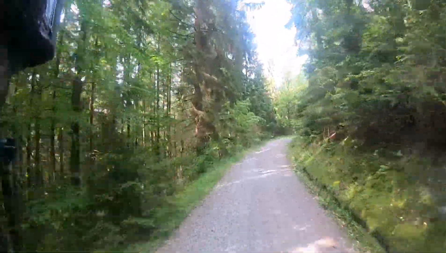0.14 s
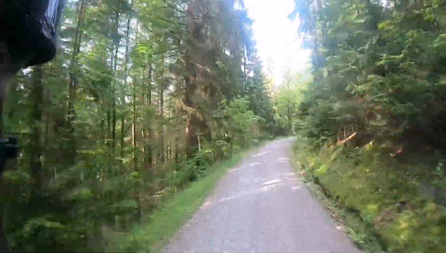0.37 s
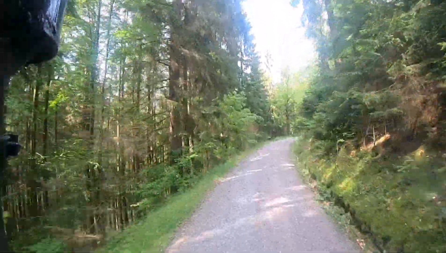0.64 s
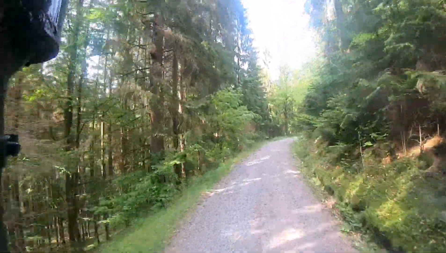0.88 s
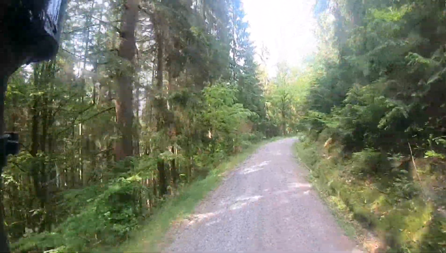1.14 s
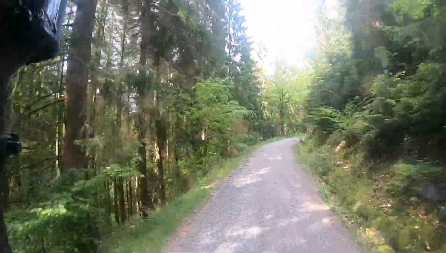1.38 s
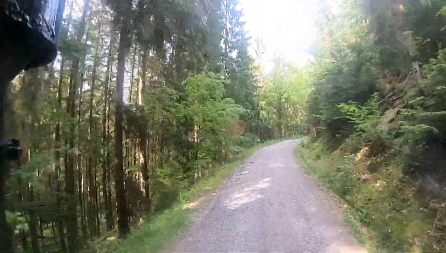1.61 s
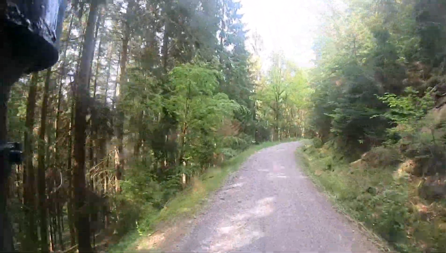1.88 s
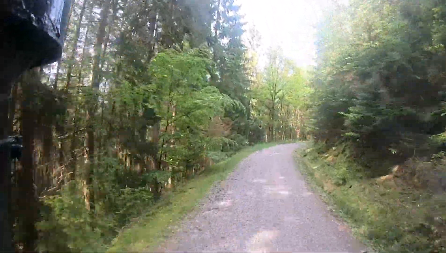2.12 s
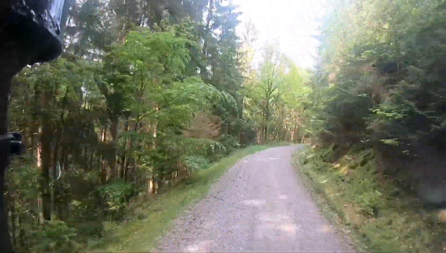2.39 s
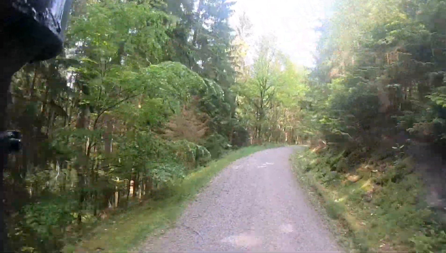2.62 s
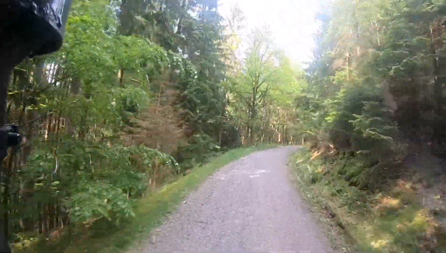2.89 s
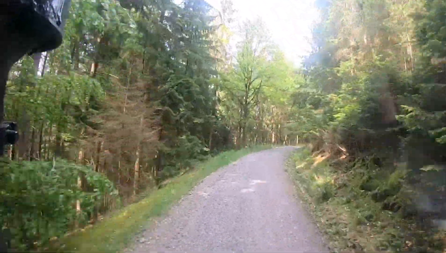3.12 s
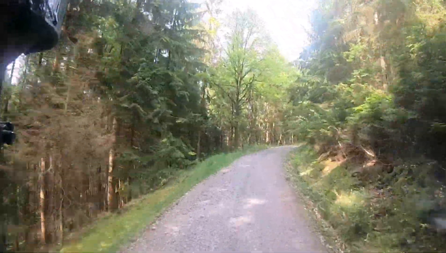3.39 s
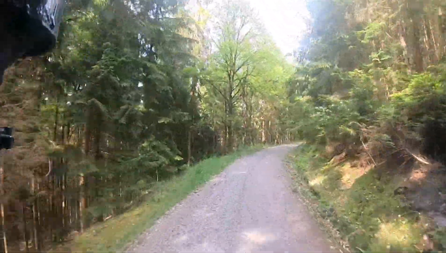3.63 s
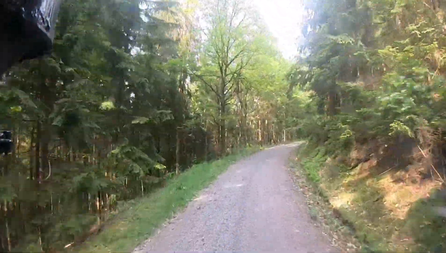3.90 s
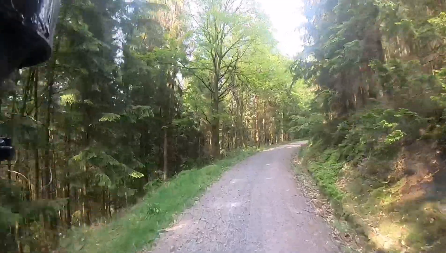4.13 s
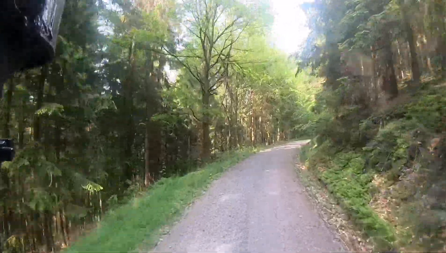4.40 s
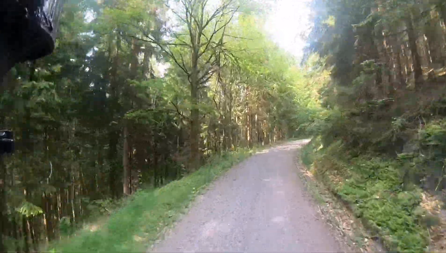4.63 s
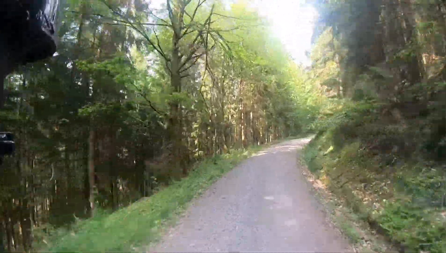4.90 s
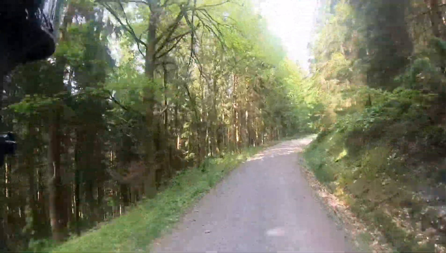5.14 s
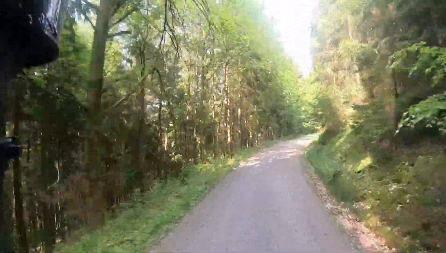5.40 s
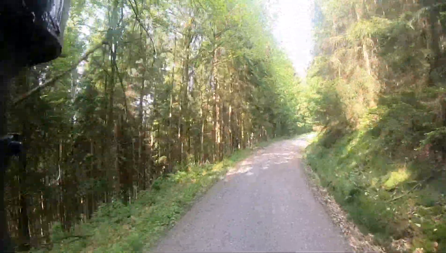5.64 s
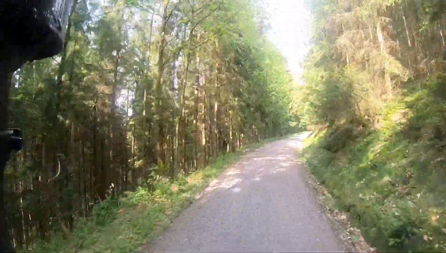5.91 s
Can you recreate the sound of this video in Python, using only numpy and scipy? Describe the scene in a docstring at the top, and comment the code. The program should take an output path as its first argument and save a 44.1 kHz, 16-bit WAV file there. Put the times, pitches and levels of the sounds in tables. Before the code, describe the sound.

A six-cylinder diesel truck rolls along a gravel forest track, captured by two close microphones outside the cab for about six seconds. A deep, near-constant firing boom of about 58 hertz leads, with low body rumble, wavering engine tones and throbbing mechanical clatter. Clatter and tyre hiss lift briefly around 0.1 s, then settle to a faint gravel crunch. A single low knock lands at 0.9 s, followed by light stone ticks on metal at 1.25 to 1.5 s. From about 1.2 to 4.7 s a thin gear whine near 1400 hertz flutters in and out. The cab shudders in low pulses around 0.6, 1.7 and 4.3 to 5.2 s. A tiny cluster of ringing ticks comes at 4.75 s as revs step up; the whine stops, and the exhaust grows slightly higher and gruffer, with more tyre noise, to the end. The treble is dull.

```python
"""A six-cylinder diesel truck drones along a gravel track, heard through two microphone ports outside the cab.
Wavering sines locked to the crank make the firing boom, its crank orders and the whine of a gear.
Shaped random spectra make body rumble, engine clatter and tyre hiss; clatter and hiss lift briefly near the start.
The cab shudders in low sines; short ringing noise bursts make one low knock and a few stones ticking on metal."""
import sys
import numpy as np
from scipy import signal
from scipy.fft import rfft, irfft
from scipy.io import wavfile
from scipy.ndimage import uniform_filter1d

SR = 44100
rng = np.random.default_rng(int(sys.argv[2]) if len(sys.argv) > 2 else 0)


def output_pcm(signal):
    """Save a mono or channel-first signal as 16-bit PCM at the path in sys.argv[1].

    Samples are clipped to [-1, 1] before scaling.
    """
    pcm = np.clip(np.atleast_2d(signal).T, -1, 1) * 32767
    wavfile.write(sys.argv[1], SR, np.round(pcm).astype(np.int16))


def volts_from_db(level):
    """Convert decibel levels to linear amplitude ratios."""
    exponent = np.asarray(level, float) / 20
    return 10 ** exponent


N = 265482
TIME = np.arange(N) / SR  # s
FIRINGS_PER_TURN = 3


def evened(x):
    """Scales to rms 1."""
    return x / np.sqrt(np.mean(x ** 2) + 1e-20)


def read(points, hz):
    """Reads a spectrum on a log frequency axis."""
    f, value = np.transpose(points)
    return np.interp(np.log(hz + 1), np.log(f + 1), value)


def curves(rows):
    """Joins table rows by straight lines in time."""
    s, *columns = np.transpose(rows)
    return [np.interp(TIME, s, column) for column in columns]


def wander(top_hz):
    """Slow random drift of rms 1, from smoothed steps drawn 2 * top_hz times a second."""
    steps = uniform_filter1d(rng.standard_normal(1000), size=2)
    return evened(np.interp(TIME * top_hz * 2, np.arange(1000), steps))


def pair(mid, side):
    """Left and right from middle and side."""
    return np.array([mid + side, mid - side])


def noise(mid_db, side_db, size, patchy_db, lag=0):
    """Random short-time spectra with drifting patches, as middle and side of rms 1 each.
    lag is the share of the side made of the middle a quarter cycle late, so the left trails."""
    frames = 4 * N // size + 5
    hz = np.fft.rfftfreq(size, 1 / SR)
    a, b, c, d, patches = rng.standard_normal((frames, len(hz), 5)).T
    patches = uniform_filter1d(patches, size=16, axis=0)  # across frequency
    patches = evened(uniform_filter1d(patches, size=6, axis=1))  # across time
    lag = np.clip(lag, 0, 1)
    mid = a + 1j * b
    side = np.sqrt(1 - lag ** 2) * (c + 1j * d) + lag * (b - 1j * a)
    shaped = [mid * volts_from_db(mid_db(hz))[:, None], side * volts_from_db(side_db(hz))[:, None]]
    spectra = shaped * volts_from_db(patchy_db * patches)
    mid, side = signal.istft(spectra, nperseg=size, noverlap=3 * size // 4)[1][:, :N]
    return evened(mid), evened(side)


def exhaust(crank, boom_db, bark_db):
    """The firing boom and the crank orders as wavering sines; the exhaust orders swell with the bark."""
    # crank orders beside the boom: (multiple of crank speed, level [dB], side over middle [dB])
    crank_orders = [(2.5, -37, -30), (3.5, -38, -30), (4, -42, -28), (4.5, -31.5, -25), (5, -38, -24),
                    (5.5, -41, -24), (6, -34, -23), (6.5, -43, -23), (7, -42, -22), (7.5, -42, -22),
                    (8, -42, -22), (9, -34.5, -22), (10, -45, -22), (10.5, -46, -22), (12, -42, -22),
                    (13.5, -45, -20), (15, -44, -20), (16, -45, -20), (18, -45, -18), (23.5, -48, -14),
                    (24, -45, -14), (27, -46, -12), (27.5, -48, -11), (30, -44, -6), (30.5, -49, -8),
                    (35, -45, -7), (43.5, -50, -1), (49.5, -50, 0), (56, -45.5, -6)]
    boom = volts_from_db(boom_db + 0.44 * wander(top_hz=7.2)) * np.cos(FIRINGS_PER_TURN * crank)
    out = pair(boom, -volts_from_db(-42) * boom)
    for order, db, side_db in crank_orders:
        is_exhaust = order in (7.5, 9, 10.5, 12, 15)
        swell_db = (bark_db - bark_db.mean()) * is_exhaust
        start_phase = 2 * np.pi * rng.random()
        slip = start_phase + (.15 + .03 * order) * wander(top_hz=5)  # high orders waver more
        level = volts_from_db(db + swell_db + 1.6 * wander(top_hz=6))
        phase = order * crank + slip
        out += level * pair(np.cos(phase), volts_from_db(side_db) * np.sin(phase))
    return np.sqrt(2) * out  # table levels are rms


def gear(crank):
    """Meshing teeth sing a thin, fluttering line, a sine at the tooth rate."""
    # the whine sings under load and stops as the revs jump: (time [s], level [dB])
    whine_course = [(0, -48), (1.05, -47), (1.2, -40), (1.5, -37.5), (1.8, -37), (2.18, -47), (2.29, -34.5),
                    (2.42, -40), (2.63, -34.5), (2.8, -39), (3.1, -37.5), (3.41, -34), (3.51, -45),
                    (3.62, -37), (3.8, -37), (3.92, -46), (4.03, -35), (4.13, -44), (4.36, -40),
                    (4.55, -50), (4.68, -42), (4.8, -60), (6.02, -62)]
    teeth, side_under_mid_db = 70, -10
    level_db, = curves(whine_course)

    def line(db):
        level = volts_from_db(db + 1.2 * wander(top_hz=30))
        return level * np.cos(teeth * crank + .9 * wander(top_hz=14))

    mid = line(level_db)
    side = line(level_db + side_under_mid_db)
    return np.sqrt(2) * pair(mid, side)


def panels(hz, column):
    """Lift in dB where panels resonate, and dips at notches; column 2 is the middle, 3 the sides."""
    # resonances and notches: (frequency [Hz], width [Hz], middle lift [dB], side lift [dB])
    panel_modes = [(470, 27, 2, 2), (547, 36, 2.5, -2), (614, 11, 6, 17.5), (699, 8.7, 1.5, 5),
                   (794, 22, 0.5, 8), (951, 34, 4, 4), (1057, 14, 2.5, -1), (1200, 9.2, 3.5, -1),
                   (1510, 37, 5, 9), (1657, 29, 3.5, -3), (1150, 32, -3, -4), (1600, 30, -1.5, -1),
                   (614, 51, -3.5, -2.5), (2327, 40, -5, -1), (1907, 35, 4.5, 4), (2380, 25, 3.5, 2),
                   (2530, 62, -18, -2), (3420, 98, -7, 14)]
    return sum(mode[column] / (1 + (2 * (hz - mode[0]) / mode[1]) ** 2) for mode in panel_modes)


def clatter(crank, level_db):
    """Valve and injection noise through the panels, throbbing with the crank."""
    # spectrum shapes of middle and side: (frequency [Hz], relative density [dB per Hz])
    mid_shape = [(120, -25), (200, -2.5), (216, -6.5), (316, -4.5), (420, -8.5), (646, -9), (967, -10),
                 (1270, -13), (1900, -14), (2400, -17), (2600, -23.5), (3600, -33), (5000, -43)]
    side_shape = [(120, -46), (200, -30), (437, -12.5), (590, -13), (955, -1.5), (1160, -5), (1800, -7),
                  (2200, -11), (2600, -9.5), (3600, -31.5), (5000, -23)]
    mid, side = noise(lambda hz: read(mid_shape, hz) + panels(hz, column=2),
                      lambda hz: read(side_shape, hz) + panels(hz, column=3),
                      size=4096, patchy_db=0.17, lag=.45)
    throb_db = .4 * np.cos(crank) + .45 * np.cos(3 * crank / 2)
    throb_db += 0.16 * np.cos(FIRINGS_PER_TURN * crank) + .5 * np.cos(2 * FIRINGS_PER_TURN * crank)
    return volts_from_db(level_db + throb_db) * pair(mid, volts_from_db(-4.5) * side)


def cab(crank):
    """The cab shudders on its mounts at its own low pitch and at twice the crank speed."""
    # bouncing of the cab: (time [s], shudder level [dB], twice-crank shake level [dB])
    bounce_course = [(0, -45, -30), (.6, -28, -29), (1, -49, -41), (1.45, -39, -36), (1.65, -21, -34),
                     (2, -34, -36), (2.25, -37, -27), (3.4, -42, -36), (3.65, -37, -26), (4.25, -25, -25),
                     (4.6, -23, -36), (4.9, -38, -19), (5.15, -20, -28), (5.45, -47, -41), (6.02, -37, -35)]
    shudder_hz = 26.6
    shudder_db, shake_db = curves(bounce_course)
    turns = shudder_hz * TIME + 0.15 * wander(top_hz=2.71)
    shudder = volts_from_db(shudder_db + 2.1 * wander(top_hz=6.3)) * np.cos(2 * np.pi * turns)
    shake = volts_from_db(shake_db + 1.5 * wander(top_hz=5)) * np.cos(2 * crank + .8 * wander(top_hz=4))
    return np.sqrt(2) * pair(shudder + shake, volts_from_db(-20) * shake)


def rumble(faster):
    """Wheels on the uneven track shake the body, harder with speed; nearly the same at both ports."""
    # spectrum shape: (frequency [Hz], relative density [dB per Hz])
    rumble_shape = [(5, -26), (14, -13), (22, 0), (38, 1), (48, -4), (68, -2.5), (78, -10.5), (100, -3.5),
                    (135, -7.5), (185, -5), (215, -18), (300, -41.5)]
    cruise_db, db_per_turn, side_db = -24, 0.65, -29  # db_per_turn: dB per crank turn/s
    mid, side = noise(lambda hz: read(rumble_shape, hz), lambda hz: read(rumble_shape, hz),
                      size=8192, patchy_db=.3)
    return volts_from_db(cruise_db + db_per_turn * faster) * pair(mid, volts_from_db(side_db) * side)


def hiss(crank, crunch_db, level_db):
    """Tyres crush gravel: wide hiss that flickers, with a slight puff at each firing."""
    # spectrum shape: (frequency [Hz], relative density [dB per Hz])
    hiss_shape = [(1200, -27), (2500, 3.5), (3400, 3.5), (3800, -1), (5000, 1.5), (6000, 1.5), (7200, -3),
                  (8500, 3), (9800, -0.5)]
    mid, side = noise(lambda hz: read(hiss_shape, hz), lambda hz: read(hiss_shape, hz),
                      size=512, patchy_db=1.5, lag=.2)
    throb_db = .55 * np.cos(crank) + 1.1 * np.cos(FIRINGS_PER_TURN * crank) + .7 * wander(top_hz=14)
    both = pair(mid, volts_from_db(-6.5) * side)
    low_pass = signal.butter(4, 4200, fs=SR, output="sos")
    crunch = signal.sosfiltfilt(low_pass, both)  # coarse stones sound lower
    fine = both - crunch
    return volts_from_db(throb_db) * (volts_from_db(crunch_db) * evened(crunch) + volts_from_db(level_db) * evened(fine))


def ticks():
    """Fading noise bursts each ring one band: a low burst near 650 Hz, then stones thrown on metal."""
    # the low burst in the first row, then the stones:
    # (time [s], middle peak [dB], ring [Hz], nominal ring width [Hz], rattle length [s])
    tick_rows = [(.879, -14, 650, 900, .001), (1.25, -25, 9500, 5000, .025),
                 (1.254, -24.5, 7600, 1300, .004), (1.2645, -24, 7000, 900, .006),
                 (1.354, -31, 5600, 1500, .001), (1.518, -21.5, 6400, 1500, .001),
                 (4.7455, -27.5, 3420, 170, .001), (4.752, -26.5, 3380, 200, .001),
                 (4.758, -28, 3500, 170, .001), (4.766, -31, 3300, 200, .001)]
    length = 2000  # samples
    out = np.zeros((2, N))
    t = np.arange(length) / SR
    shakes = rng.standard_normal((len(tick_rows), 2, length))
    shakes[:, 0, 0] = 5  # first blow stands over the rattle, in the middle
    for (s, db, hz, width, rattle_s), shake in zip(tick_rows, shakes):
        burst = shake * np.clip(1 - t / max(rattle_s, .001), 0, 1) ** .5
        ring = t * np.exp(-np.pi * width * t * 1.5) * np.sin(2 * np.pi * hz * t)
        mid, side = signal.fftconvolve(burst, ring[None], axes=1)[:, :length]
        at = round(s * SR)
        out[:, at:at + length] += volts_from_db(db) * pair(mid, 0.28 * side) / abs(mid).max()
    return out


def opening_swell():
    """Brief lift of the clatter, crunch and hiss near the start, 1 at its top."""
    top_s, rise_s, fade_s = 0.13, 0.16, 0.28
    rise = np.exp(-((TIME - top_s) / rise_s) ** 2)
    fade = np.exp((top_s - TIME) / fade_s)
    return np.where(TIME < top_s, rise, fade)


def scene():
    """Engine, body and road together; tyres and body grow louder with crank speed."""
    # engine course: (time [s], crank speed [turns/s], firing boom [dB], exhaust bark [dB])
    engine_course = [(0, 19.39, -15.5, -33), (.3, 19.15, -14.5, -39), (.75, 19.2, -14.2, -39),
                     (1, 19.3, -14.1, -34.5), (1.3, 19.5, -14.8, -33.5), (1.55, 19.6, -14.9, -33),
                     (1.8, 19.52, -14.9, -36.5), (2.1, 19.56, -14.9, -37), (2.3, 19.67, -14.8, -36),
                     (3, 19.74, -14.6, -35), (3.4, 19.76, -14.5, -32), (3.8, 19.8, -14.3, -36),
                     (4.05, 19.88, -15.9, -33), (4.4, 19.74, -15.9, -33), (4.6, 19.81, -17.7, -34),
                     (4.8, 20.3, -16.7, -37), (5.15, 20.53, -16.5, -28.5), (5.4, 20.4, -15, -32),
                     (5.55, 20.47, -14.7, -29), (5.85, 20.62, -14.5, -26.5), (6.02, 20.67, -14.5, -27)]
    turns_per_s, boom_db, bark_db = curves(engine_course)
    crank = 2 * np.pi * np.cumsum(turns_per_s) / SR  # crank angle, radians
    faster = turns_per_s - 19.6  # over cruising revs, turns/s
    swell = opening_swell()
    # cruising level [dB], then dB per turn/s for the tyres, then swell [dB]
    clatter_db = -26 + 2 * swell
    crunch_db = -41 + 2.5 * faster + 4.5 * swell
    hiss_db = -44 + 3 * faster + 7 * swell
    engine = exhaust(crank, boom_db, bark_db) + gear(crank) + clatter(crank, clatter_db)
    return engine + cab(crank) + rumble(faster) + hiss(crank, crunch_db, hiss_db) + ticks()


def top_cut(x):
    """Nothing passes above the cut-off."""
    return signal.sosfilt(signal.butter(12, 15200, fs=SR, output="sos"), x)


def record(dry):
    """The two ports lean by band, the treble thins above 10 kHz and peaks are rounded off."""
    # balance of the ports: (frequency [Hz], left over right [dB])
    port_lean = [(60, -.7), (130, -.4), (290, .5), (640, .9), (1400, -1.8), (3080, -.6), (6770, -2),
                 (9500, -1.5), (14900, 3)]
    # thinned treble, with a dip near 11.5 kHz and a cut at 15 kHz: (frequency [Hz], level [dB])
    treble_thinning = [(9900, 0), (10900, -8), (11300, -20), (11600, -21), (11800, -15.5), (12300, -17),
                       (14300, -17), (14700, -28), (15150, -35), (15250, -70)]
    hz = np.fft.rfftfreq(N, 1 / SR)
    half = volts_from_db(read(port_lean, hz) / 2)
    response = volts_from_db(read(treble_thinning, hz)) * np.array([half, 1 / half])
    leaned = irfft(rfft(dry) * response, N)
    rounded = np.tanh(leaned)
    return top_cut(rounded)


dry = scene()
out = record(dry)
output_pcm(out)
```